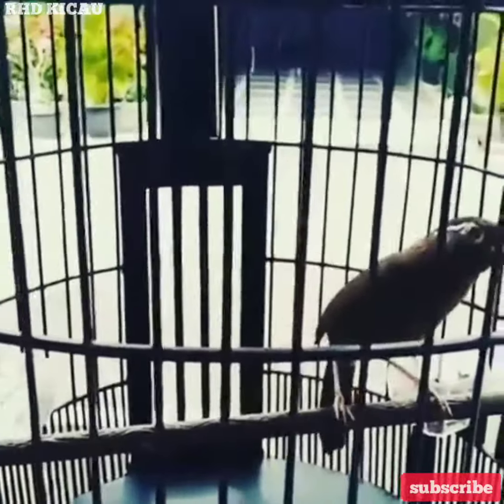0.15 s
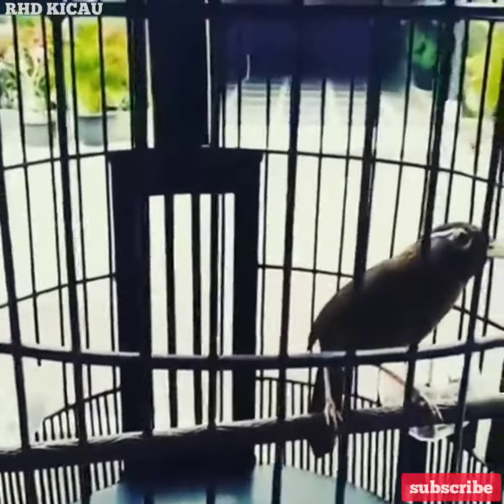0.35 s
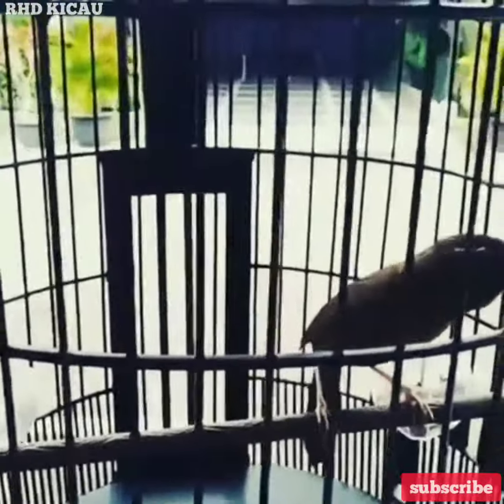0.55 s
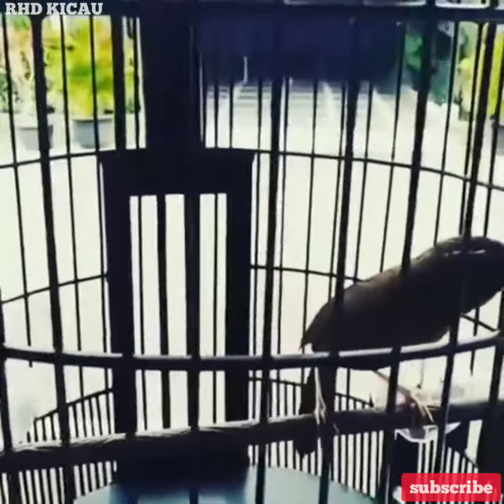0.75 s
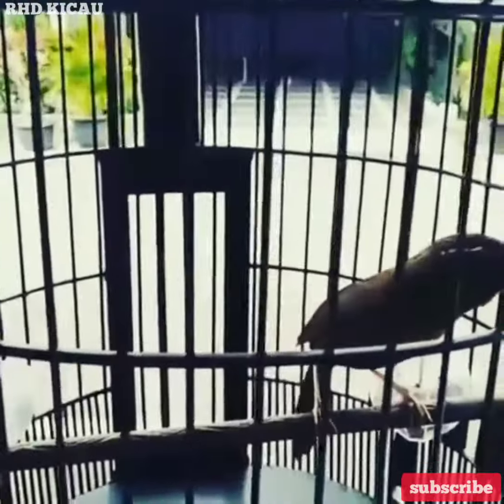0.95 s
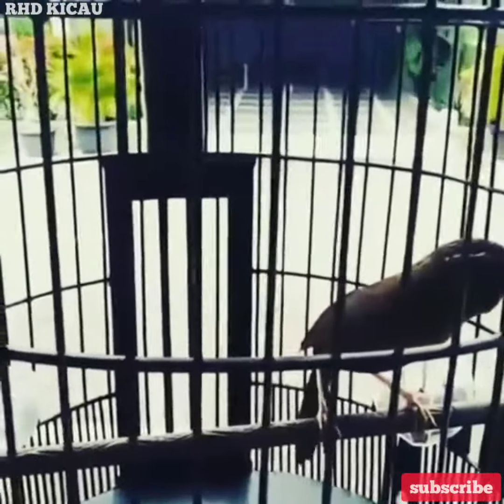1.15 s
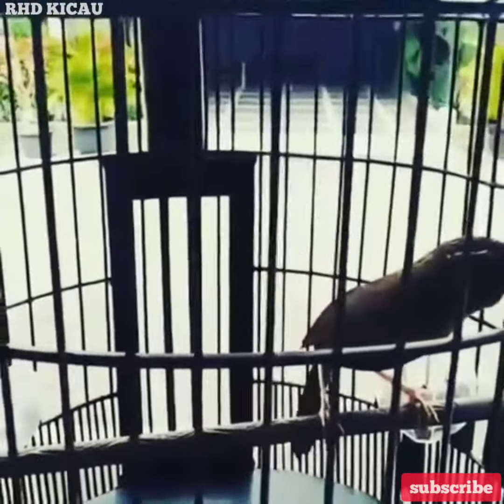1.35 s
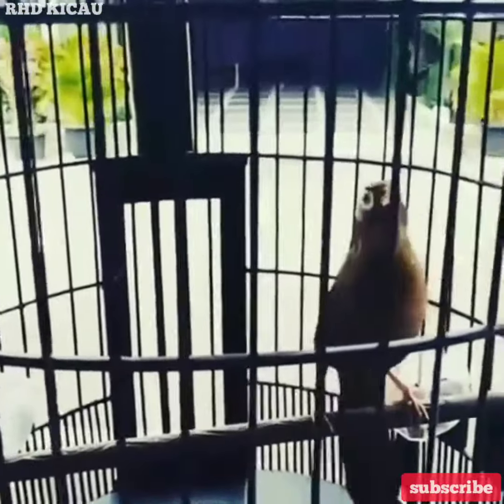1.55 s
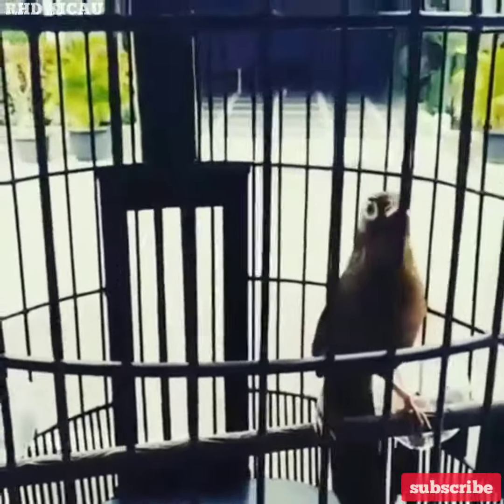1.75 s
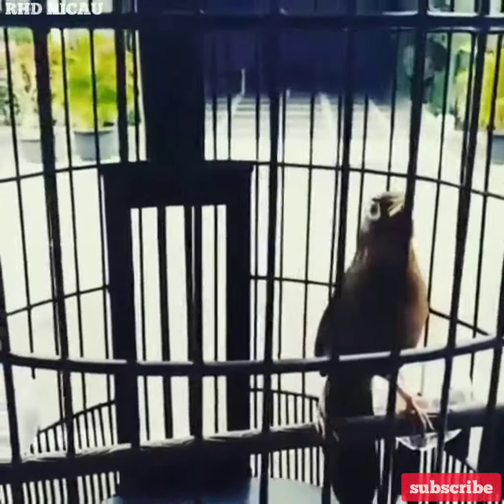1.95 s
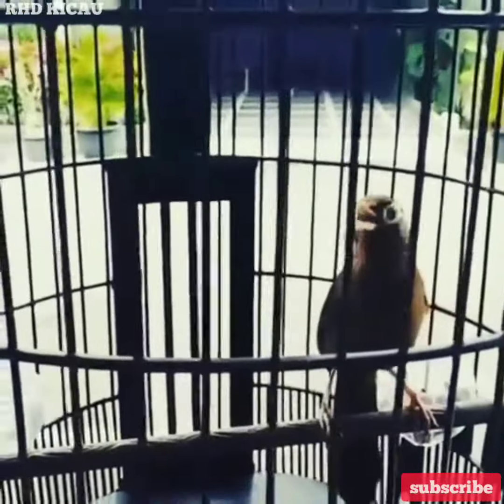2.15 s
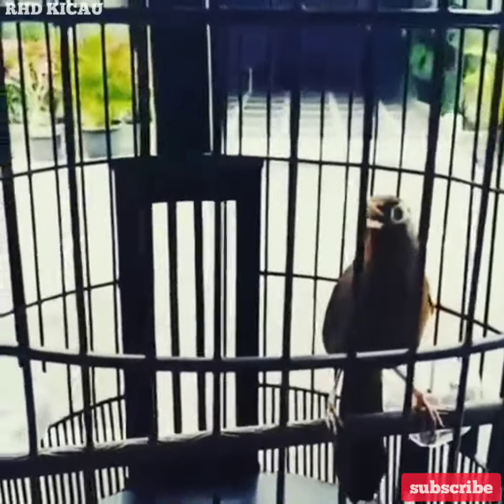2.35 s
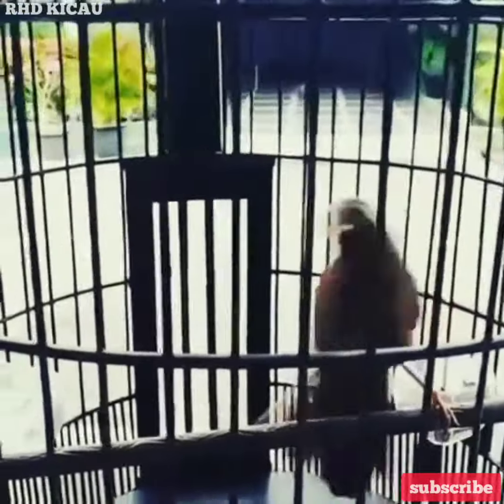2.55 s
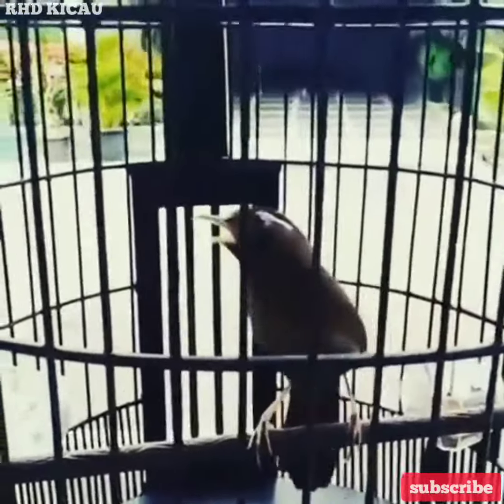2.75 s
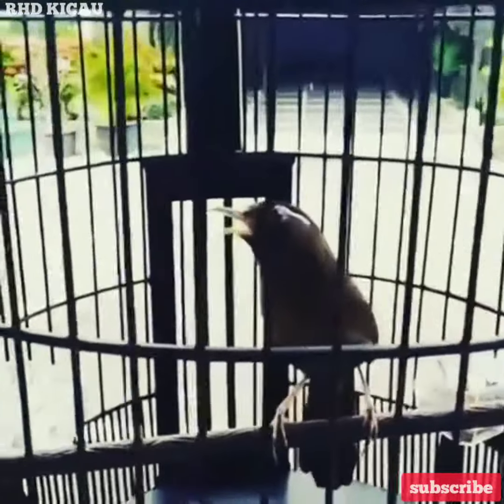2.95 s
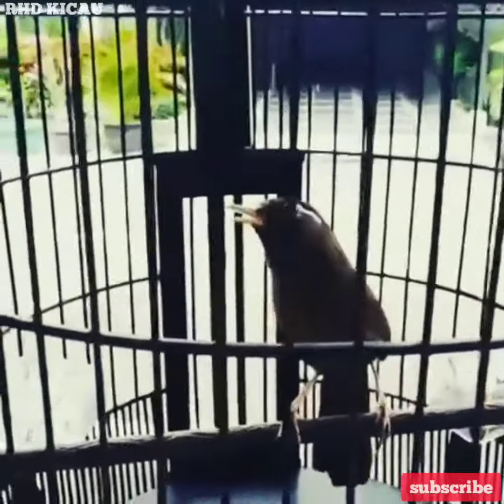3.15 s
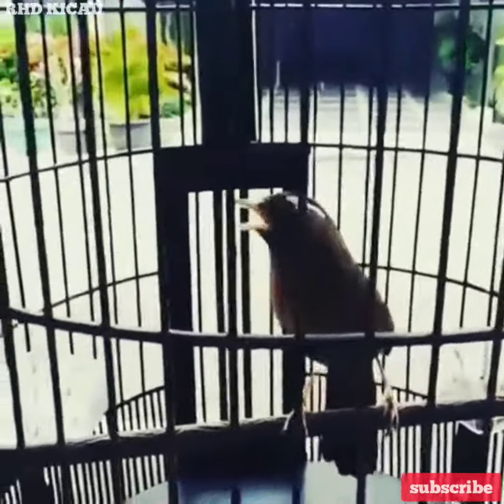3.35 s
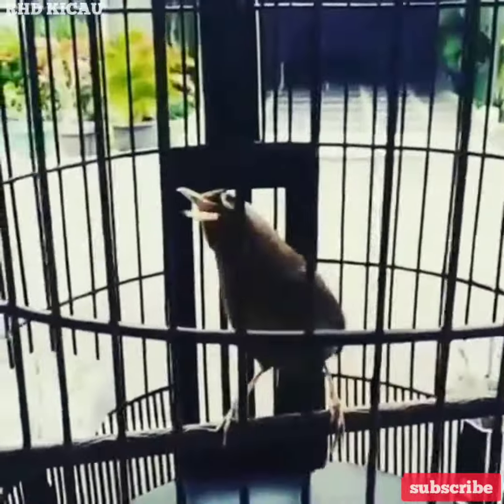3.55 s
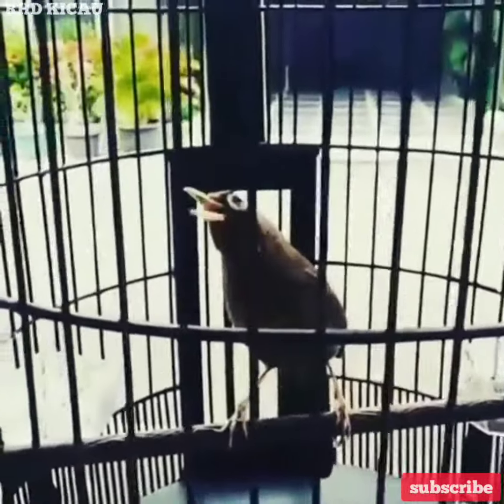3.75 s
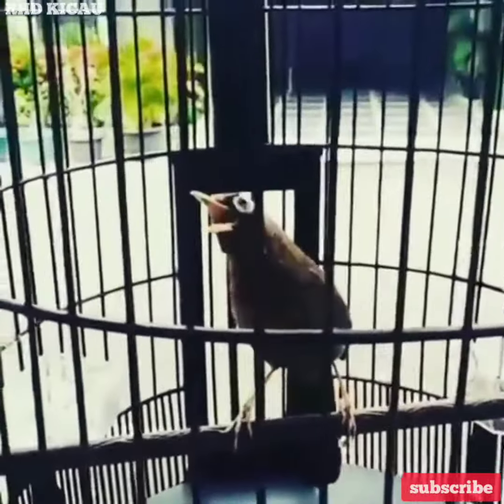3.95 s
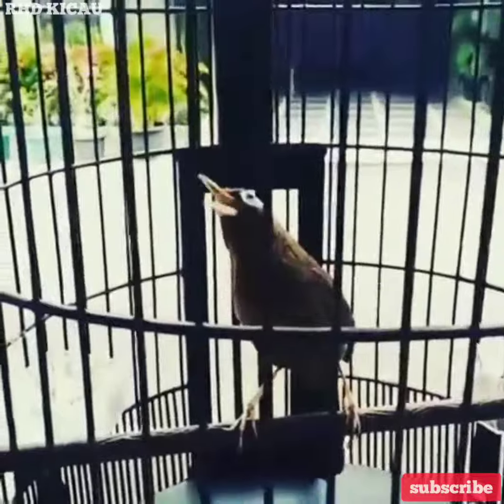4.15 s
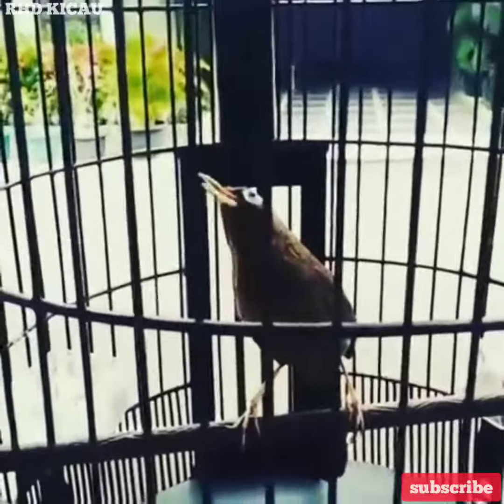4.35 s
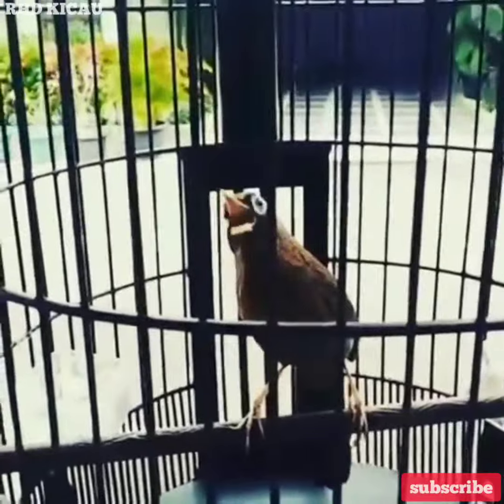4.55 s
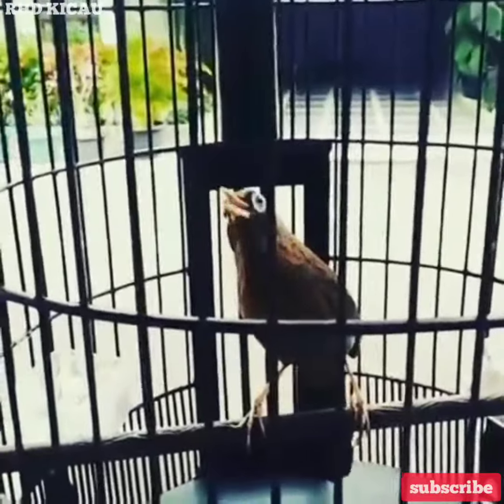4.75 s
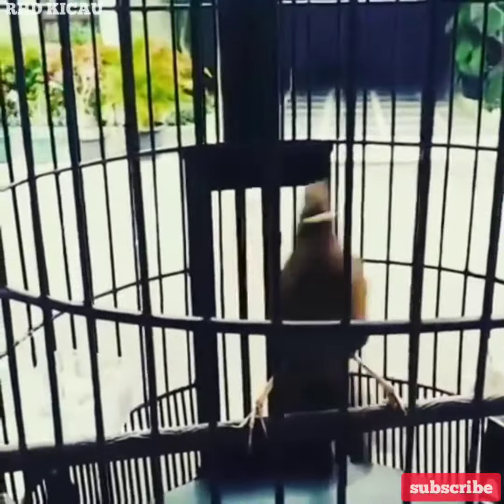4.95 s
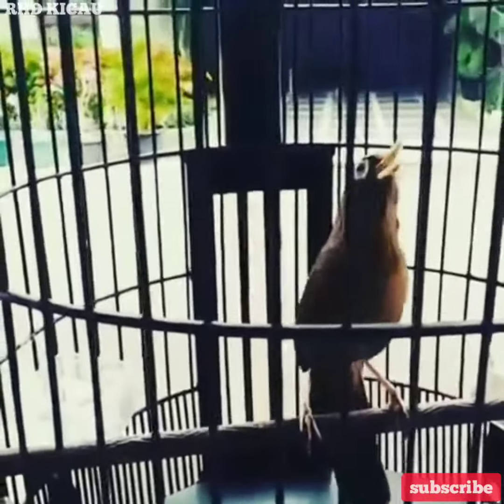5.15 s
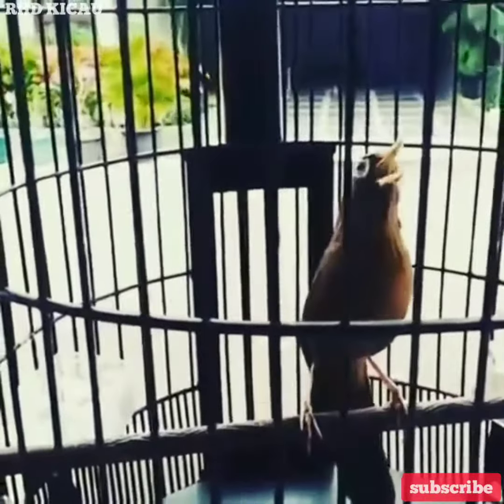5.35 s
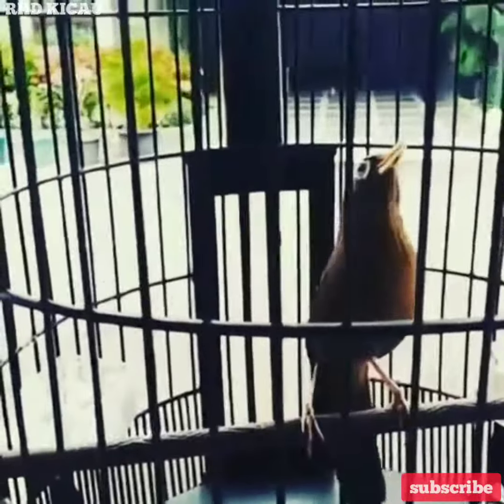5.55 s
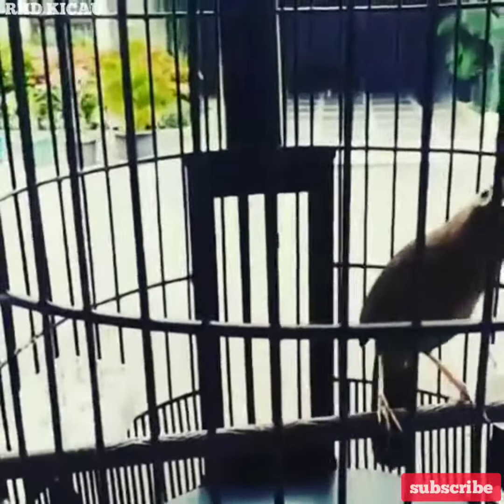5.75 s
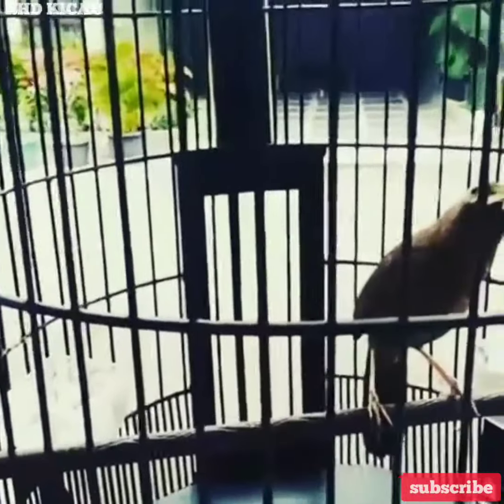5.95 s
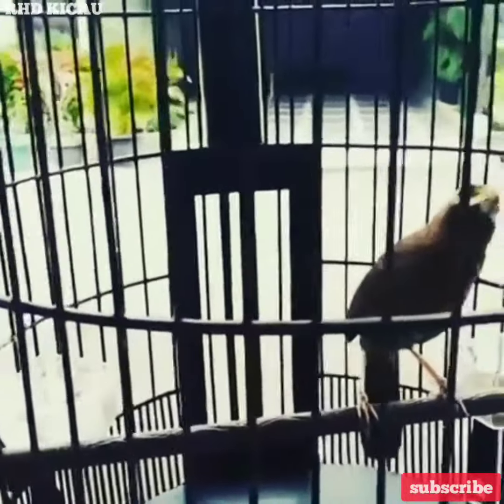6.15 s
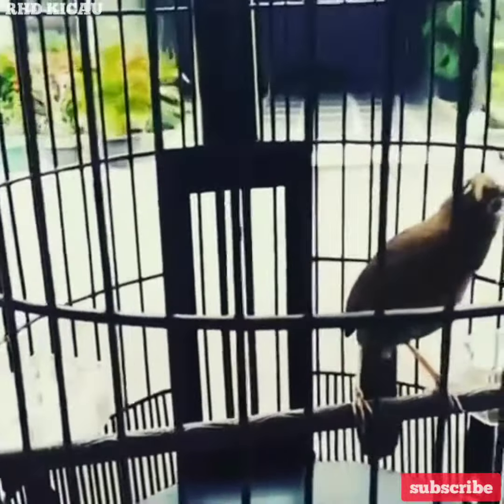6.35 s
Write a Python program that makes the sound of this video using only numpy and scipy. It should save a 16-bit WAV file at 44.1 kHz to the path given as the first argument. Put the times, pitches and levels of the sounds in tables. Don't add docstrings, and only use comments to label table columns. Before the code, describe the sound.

A near bird in a cage sings pure, fluttering whistles with short porch reverberation over a very quiet yard hush. Low slurs repeat at even spacing, then bright shivering trills split by a small buzz, then high whistles and two upward sweeps. Another bird answers softly from afar. Claws knock the perch near the start and again late, before low, blunt wind buffets strike the phone microphone.

```python
import sys
import numpy as np
from scipy import signal
from scipy.fft import rfft, irfft
from scipy.io import wavfile
from scipy.ndimage import uniform_filter1d

SR = 44100
rng = np.random.default_rng(int(sys.argv[2]) if len(sys.argv) > 2 else 0)


def volts_from_decibels(level):
    exponent = np.asarray(level, float) / 20
    return 10 ** exponent


def store_wav(level_fs):
    pcm = np.round(np.clip(np.atleast_2d(level_fs), -1, 1) * 32767)
    wavfile.write(sys.argv[1], SR, pcm.T.astype(np.int16))


N = 282681

# time in seconds, level in dB.
WIND_LEVEL = [(0, -74.5), (2.4, -71.5), (2.65, -63), (3.3, -70), (4.4, -64.5), (5.1, -51.5), (5.6, -64.5),
              (5.8, -74), (5.91, -47.5), (6.08, -35.5), (6.25, -31.5), (6.41, -19)]
# start in seconds, peak in dB, bright part in dB.
BUFFETS = [
    (5.947, -28.5, -43),
    (5.998, -30, -48),
    (6.092, -15, -53),
    (6.15, -18, -59),
    (6.268, -18.5, -16.5),
    (6.347, -28, -14),
    (6.378, -23.5, -6.5),
    (6.398, -16, -18.5),
]
# frequency in Hz, density in dB per Hz.
WIND_COLOUR = [(20, -39.5), (45, 2.5), (75, -2.5), (150, -11), (300, -22), (500, -43), (1000, -59.5),
               (2500, -84.5)]
# frequency in Hz, density in dB per Hz.
HUSH = [(150, -20.5), (300, 0), (600, 1), (1500, -2), (3000, -10.5), (6000, -11.5), (10000, -9),
        (13400, -14)]
HUSH_DB = -69.5
# frequency in Hz, t60 in seconds.
PORCH_T60 = [(500, 0.33), (2000, 0.51), (3500, 0.41), (7000, 0.36), (12000, 0.24)]
# delay in seconds, level in dB.
ECHOES = [(.0007, -20.5), (.0016, -14.5), (.0029, -21), (.0047, -15), (.0083, -13.5), (0.017, -16)]
# frequency in Hz, gain in dB.
WET = [(500, 11), (3800, -2.5), (5000, 5.5), (10000, 9), (13000, 1)]
# frequency in Hz, gain in dB.
MIC_PORT = [(30, 7.5), (100, 17), (4000, 0), (6500, 9.5), (8800, 13), (10200, 20.5), (11500, 17),
            (13000, 5.5)]
# frequency in Hz, level in dB.
GRIT = [(60, -25), (200, -12.5), (700, -5), (1600, -7), (2400, -27.5)]

# start in seconds, length in seconds, level in dB, first pitch in Hz, last pitch in Hz.
FAR_BUZZES = [
    (0.096, 0.45, -39, 3450, 2851),
    (.72, 0.39, -35.5, 3604, 2828),
    (1.215, 0.4, -35.5, 3654, 2930),
    (1.728, 0.37, -34.5, 3598, 2940),
    (6.329, 0.54, -36.5, 3410, 2810),
]
# share of the length, level in dB.
FAR_SWELL = [(0, -8.5), (.3, -3), (.72, -5), (1, -17)]

# start in seconds, peak in dB, wood in dB, wire in dB.
TAPS = [
    (0.081, -59, -32, -3),
    (0.116, -17, -23, -43.5),
    (0.22, -47, -15, -8),
    (5.879, -32, -10.5, -18.5),
]
# frequency in Hz, level in dB, t60 in seconds.
WOOD = [(715, -0.5, 0.27), (1135, -54, 0.057), (1463, 14, 0.047), (2320, -1, 0.074)]
# frequency in Hz, level in dB, t60 in seconds.
WIRE = [(8740, 4, 0.2), (9900, -6, 0.32), (12100, 3, 0.23)]

# multiple of the pitch, level in dB.
OVERTONES = [(2, -37), (3, -44.5), (4, -44), (5, -44.5), (6, -54.5)]
# multiple of the pitch, level in dB re that voice.
HALVES = [(.5, -8.5), (1.5, -7.5), (2.5, -22), (3.5, -29)]
# frequency in Hz, gain in dB.
BEAK = [(3000, -25.5), (4200, -0.5), (5300, 5), (6000, -1), (7200, -18), (8500, 9.5), (10000, 5.5),
        (13000, 9)]
# frequency in Hz, level in dB.
AIR = [(100, -45), (400, -36.5), (1500, -27), (3000, -8), (4500, -15.5), (5600, -26.5), (7200, -19),
       (10000, -22.5), (13000, -31)]
WARBLES_PER_S, BUZZ_PER_S = 110, 195

# time of the lowest pitch in seconds, level in dB, lowest pitch in Hz,
# top of the last warble in Hz, length in seconds.
TRILL = [(2.3994, -9, 2464, 3380, 0.038), (2.5006, -9.5, 2397, 3506, 0.041),
         (2.5942, -8.5, 2390, 3393, 0.046), (2.695, -10, 2347, 3625, .04), (2.7998, -6.5, 2453, 3746, .036),
         (2.9064, -7, 2470, 3704, .035), (3.011, -6, 2513, 3800, 0.037), (3.118, -5, 2512, 3763, 0.034),
         (3.5915, -6.5, 2500, 3774, .032), (3.6977, -9, 2444, 3914, 0.036), (3.8028, -7, 2517, 3880, 0.04),
         (3.9196, -7, 2495, 3932, 0.031), (4.0264, -6.5, 2503, 3930, .033)]
BEAK_SHUT_HZ, BEAK_DB_PER_KHZ = 3158, 15
TRILL_CLIMB_HZ, FIRST_SWING_HZ = 420, 678.7

# time of the jump up in seconds, level in dB, lead-in in Hz, sag at the top in dB, end in Hz.
SLURS = [
    (.74, -3, 1617, -13, 1711),
    (1.037, -0.5, 1330, -13, 1735),
    (1.31, 0, 1356, -8, 1703),
    (1.6, -0.5, 1342, -9.5, 1738),
    (1.885, -2.5, 1377, -0.5, 1709),
]
SLUR_TOP_HZ, SLUR_BEAK_DB, SLUR_AIR_DB = 2131.4, -5.5, 3.5
LEAD_DB_PER_KHZ = 28.5

# time after start in seconds, level in dB, pitch in Hz,
# warble swing above it in Hz, half-pitch voice in dB.
OPENER = [(0, -33, 3227, 1, -43.5), (.014, -13, 2794, -0.5, -53), (.019, -15.5, 2748, 299.5, -67.5),
          (.046, -14, 2950, 549, -49), (.069, -14.5, 3260, 950, -24)]
# as for the opener, in s, dB, Hz, Hz, dB.
BUZZ = [(0, -22, 2640, 0.5, -35), (.011, -19, 2507, -1.5, -43), (.019, -20.5, 1807, 193, -39),
        (.049, -17, 1896, 360, -42), (.084, -15, 1990, 625, -54), (.109, -20, 1835, 600.5, -43),
        (.137, -20.5, 1736, 600.5, -22), (.151, -32.5, 1253, 795.5, -19), (.171, -51, 894, 900, -50)]
# as for the opener, in s, dB, Hz, Hz, dB.
CLIMB = [(0, -21, 3220, -1.5, -39), (.024, -11, 2595, -1, -49.5), (.029, -14.5, 2697, 830, -72),
         (.053, -11.5, 3205, 596.5, -68), (.065, -13.5, 3686, 1.5, -60.5), (.112, -9, 3365, 0.5, -54.5),
         (.143, -8, 3522, 0.5, -42), (.157, -12.5, 3194, 980.5, -31), (.174, -33.5, 2540, 1588, -41)]
# as for the opener, in s, dB, Hz, Hz, dB.
DIP = [(0, -35, 3700, 0, -15), (.022, -11.5, 3991, 0, -24.5), (.048, -9.5, 3955, 0, -36),
       (.067, -8.5, 3412, 1.5, -54.5), (.091, -12.5, 3195, -1.5, -53.5), (.13, -7, 3410, 1.5, -49.5),
       (.14, -12.5, 3440, -2.5, -52), (.147, -14, 3130, 948.5, -32.5), (.16, -27, 2530, 1530.5, -39.5)]
# as for the opener, in s, dB, Hz, Hz, dB.
RISE = [(0, -42.5, 1523, 16, -50.5), (.018, -36, 1595, 98, -34.5), (.03, -20.5, 1840, 297.5, -31),
        (.06, -14.5, 2030, 351, -43.5), (.095, -10.5, 2329, 251.5, -47.5), (.17, -9.5, 2470, 70, -54),
        (.225, -10.5, 2577, 7, -58), (.29, -8.5, 2866, 4, -40), (.31, -22.5, 2840, 348.5, -23)]
# start in seconds, stretch in time, pitch ratio, overtones in dB, air in dB.
OPENERS = [
    (2.284, .98, 1.02, 4, 7),
    (3.463, 1.03, .98, 5, 9.5),
]
# as for the openers, in s, ratio, ratio, dB, dB.
BUZZES = [
    (3.221, 1.001, 0.99, 1.2, 0),
]
# as for the openers, in s, ratio, ratio, dB, dB.
CLIMBS = [
    (4.115, 1.001, 1.001, 13.8, 8.8),
]
# as for the openers, in s, ratio, ratio, dB, dB.
DIPS = [
    (4.378, .995, .995, 12.5, 10),
    (4.632, 1.09, 1.005, 11.2, 9.8),
]
# as for the openers, in s, ratio, ratio, dB, dB.
RISES = [
    (4.919, 1.001, 1.005, -2.4, -5.5),
    (5.341, .9, .98, -0.5, 3),
]


def evened(x):
    return x / np.sqrt(np.mean(x ** 2) + 1e-20)


def read(points, hz):
    f, value = np.transpose(points)
    return np.interp(np.log(hz + 1), np.log(f + 1), value)


def add(mix, s, sound):
    part = mix[round(s * SR):][:len(sound)]
    part += sound[:len(part)]


def colour(x, points):
    return irfft(rfft(x) * volts_from_decibels(read(points, np.fft.rfftfreq(len(x), 1 / SR))), len(x))


def wander(count, per_s):
    width = max(int(SR / per_s), 1)
    return evened(uniform_filter1d(uniform_filter1d(rng.standard_normal(count), width), width))


def yard():
    return volts_from_decibels(HUSH_DB) * evened(colour(rng.standard_normal(N), HUSH))


def wind():
    s, db = np.transpose(WIND_LEVEL)
    flow = evened(colour(rng.standard_normal(N), WIND_COLOUR))
    out = flow * volts_from_decibels(np.interp(np.arange(N) / SR, s, db) + 3.5 * wander(N, 25))
    t = np.arange(1500) / SR
    for s, db, bright_db in BUFFETS:
        push = np.sin(2 * np.pi * 85 * t) * np.exp(-t / 0.004) * np.minimum(t / 0.00187, 1)
        snap = colour(rng.standard_normal(len(t)), [(250, -39.0), (450, 18.5), (1000, -1.0), (1600, -52.0)])
        snap = evened(snap) * np.exp(-t / 0.011) * np.minimum(t / 0.00145, 1)
        add(out, s, volts_from_decibels(db + 1.0) * (push + volts_from_decibels(bright_db) * snap))
    vent = signal.butter(3, 52, "high", fs=SR, output="sos")
    return signal.sosfilt(vent, out)


def porch(x):
    taps = np.zeros(SR)
    at = np.arange(500, SR - 20, 20)
    taps[at + rng.integers(0, 20, len(at))] = rng.choice([-1., 1.], len(at))
    hz, t, z = signal.stft(taps, SR, nperseg=256)
    decay = volts_from_decibels(-60 * t / read(PORCH_T60, hz)[:, None])
    tail = signal.istft(z * decay, SR, nperseg=256)[1]
    return signal.fftconvolve(x, tail / np.linalg.norm(tail))[:N]


def far_bird():
    out = np.zeros(N)
    for s, length, db, first_hz, last_hz in FAR_BUZZES:
        t = np.arange(0, length, 1 / SR)
        flutter = np.cumsum(170 * (1 + 0.36 * wander(len(t), 90))) / SR
        pitch = first_hz + (last_hz - first_hz) * t / length + 190 * np.sin(2 * np.pi * flutter)
        turn = 2 * np.pi * np.cumsum(pitch) / SR
        voice = np.sin(turn) + volts_from_decibels(-46) * np.sin(2 * turn) + volts_from_decibels(-48) * np.sin(3 * turn)
        air_colour = [(4500, -30.5), (5800, -2.5), (7000, -9), (9000, 1.0), (13000, -19.5)]
        voice += volts_from_decibels(-23.5) * colour(rng.standard_normal(len(t)), air_colour)
        voice *= 1 - .45 * np.cos(2 * np.pi * flutter)
        swell = volts_from_decibels(db + np.interp(t / length, *np.transpose(FAR_SWELL)))
        add(out, s, swell * voice * signal.windows.tukey(len(t), .3))
    return out


def claws():
    out, t = np.zeros(N), np.arange(9000) / SR
    attack = np.minimum(t / 0.005, 1)
    for s, db, wood_db, wire_db in TAPS:
        for part_db, modes, blur_per_s in ((wood_db - 23.5, WOOD, 300), (wire_db - 20.0, WIRE, 900)):
            for hz, mode_db, t60 in modes:
                ring = volts_from_decibels(db + part_db + mode_db - 60 * t / t60) * np.sin(2 * np.pi * hz * t)
                add(out, s, ring * wander(len(t), blur_per_s) * attack)
    return out


def note(per_s, rows, bright_db, air_db):
    fast = per_s > 160
    s, *columns = np.transpose(rows)
    t = np.arange(s[0], s[-1], 1 / SR)
    age = t - s[0]
    level_db, hz, swing, half_db = (np.interp(t, s, c) for c in columns)

    uneven = 0.11 * swing / (300 if fast else 900)
    flutter = np.cumsum((swing > 0) * per_s * (1 + uneven * wander(len(t), 180))) / SR
    lift = (1 - np.cos(2 * np.pi * flutter)) / 2
    bend_s = .008 if len(rows) > 7 else .002
    hz = uniform_filter1d(hz, size=int(SR * bend_s), mode="nearest")
    pitch = hz + swing * lift + 14 * wander(len(t), 230)
    turn = 2 * np.pi * np.cumsum(pitch) / SR

    opening = np.minimum(age / 0.036, 1) ** 2
    late = opening
    if fast:
        late = opening * np.minimum(age / 0.091, 1) ** 2
    rasp = 1 + 0.48 * wander(len(t), 770)
    overtones = np.zeros(len(t))
    for k, db in OVERTONES:
        overtones += volts_from_decibels(db + read(BEAK, k * pitch)) * np.sin(k * turn) * (k * pitch < SR / 2.5)
    halves = volts_from_decibels(half_db) * sum(volts_from_decibels(db) * np.sin(k * turn) for k, db in HALVES)

    depth = 0.22 * np.minimum(swing / 150, 2) if fast else 0.35 * np.minimum(swing / 400, 1)
    throb = 1 - depth * np.cos(2 * np.pi * flutter - (0 if fast else 1.67))
    fade = np.minimum(1, np.minimum(age, s[-1] - t) / 0.0028)
    drive = np.sqrt(2) * volts_from_decibels(level_db) * throb * np.sin(np.pi / 2 * fade) ** 2
    voice = np.sin(turn) + volts_from_decibels(bright_db) * late * rasp * overtones + halves
    stir = volts_from_decibels(air_db) * opening * (0.33 + swing / 1200) * volts_from_decibels(3.3 * wander(len(t), 76))
    return s[0], drive * voice, drive * stir


def slur(s, db, lead_hz, sag_db, end_hz):
    lead_db = db + LEAD_DB_PER_KHZ * (lead_hz - 1300) / 1000
    top_db = db - 10.5 + sag_db
    rows = [(s - .062, lead_db - 49.5, 1.03 * lead_hz, 0, -34),
            (s - .014, lead_db - 36, .985 * lead_hz, 0, -38),
            (s, db - 14, .92 * SLUR_TOP_HZ, 0, -44),
            (s + 0.0095, top_db, SLUR_TOP_HZ, 0, -36),
            (s + .025, top_db, .99 * SLUR_TOP_HZ, 0, -38),
            (s + .037, db - 11.0, .935 * SLUR_TOP_HZ, 0, -58),
            (s + .07, db - 20.5, 1.03 * end_hz, 0, -38),
            (s + .116, db - 21.5, .995 * end_hz, 0, -44)]
    return note(BUZZ_PER_S, rows, SLUR_BEAK_DB, SLUR_AIR_DB)


def trill_note(s, db, low_hz, top_hz, length):
    beak_db = BEAK_DB_PER_KHZ * (top_hz - BEAK_SHUT_HZ) / 1000
    last_swing = top_hz - low_hz - TRILL_CLIMB_HZ
    rows = [(s - .022, db - 17.5, low_hz + 720, 0, -55),
            (s - .015, db - 11, low_hz + 430, 0, -55),
            (s - .005, db - 5.0, low_hz + 270, 0, -55),
            (s, db - 5.5, low_hz, 0, -55),
            (s + 0.002966, db - 5.5, low_hz, FIRST_SWING_HZ, -55),
            (s + .65 * length, db - 4.5, low_hz + 0.66 * TRILL_CLIMB_HZ, 1.15 * last_swing, -55),
            (s + 1.036 * length, db - 11, low_hz + TRILL_CLIMB_HZ, 1.1 * last_swing, -55)]
    return note(WARBLES_PER_S, rows, beak_db - 4.5, beak_db + 0.5)


def whistle(shape, per_s, s, stretch, ratio, bright_db, air_db):
    rows = [(s + stretch * after, db, ratio * hz, swing, half_db) for after, db, hz, swing, half_db in shape]
    return note(per_s, rows, bright_db, air_db)


def singer():
    song, stirred = np.zeros((2, N))
    kinds = [(OPENER, WARBLES_PER_S, OPENERS), (BUZZ, BUZZ_PER_S, BUZZES), (CLIMB, WARBLES_PER_S, CLIMBS),
             (DIP, WARBLES_PER_S, DIPS), (RISE, BUZZ_PER_S, RISES)]
    notes = [slur(*row) for row in SLURS] + [trill_note(*row) for row in TRILL]
    notes += [whistle(shape, per_s, *row) for shape, per_s, rows in kinds for row in rows]
    for s, voice, stir in notes:
        add(song, s, voice)
        add(stirred, s, stir)
    return volts_from_decibels(-3.0) * song + volts_from_decibels(-20.0) * stirred * colour(rng.standard_normal(N), AIR)


def scene():
    near, far = singer() + claws(), far_bird()
    air = near + 0.37 * far + porch(volts_from_decibels(-13) * colour(near, WET) + volts_from_decibels(-1.5) * far)
    for s, db in ECHOES:
        add(air, s, volts_from_decibels(db) * near)
    air += volts_from_decibels(-49.0) * air ** 2
    loudness = uniform_filter1d(air ** 2, size=200)
    air += volts_from_decibels(-37.0) * loudness * evened(colour(rng.standard_normal(N), GRIT))
    return np.tile(colour(air, MIC_PORT) + yard() + wind(), (2, 1))


def thin_treble(mono):
    hz, t, z = signal.stft(mono, SR, nperseg=1024)
    band = np.searchsorted([3600, 4400, 5200, 6200, 7000, 7800, 9000, 10200, 11400, 12300], hz)
    power = abs(z) ** 2
    band_db = np.array([10 * np.log10(power[band == k].mean(0) + 1e-20) for k in range(11)])
    luck, dice = rng.random((2, 11, len(t) // 3 + 1)).repeat(3, 2)[:, :, :len(t)]
    masked = band_db < 10 * np.log10(power.max(0)) - 51 - 18 * luck
    masked[-1] |= luck[0] < .4
    treble = (band > 0)[:, None]
    mid = signal.istft(z * (1 - .85 * treble * masked[band]), SR, nperseg=1024)[1][:N]

    swapped = (dice < .4)[band] * ~masked[band] * (hz > 4100)[:, None]
    level = np.sqrt(abs(uniform_filter1d(power, size=20, axis=0)))
    a, b = rng.standard_normal((len(t), len(hz), 2)).T
    side = volts_from_decibels(-9) * signal.istft(swapped * level * (a + 1j * b), SR, nperseg=1024)[1][:N]
    return np.array([mid + side, mid - side])


def roll_off(x):
    return signal.sosfilt(signal.butter(12, 13600, fs=SR, output="sos"), x)


def record(dry):
    over = np.maximum(abs(dry[0]) - .6, 0)
    bent = dry[0] - np.sign(dry[0]) * (over - .2 * np.tanh(over / .2))
    edge = signal.firwin(401, 13250, window=("kaiser", 9), fs=SR)
    mix = signal.oaconvolve(thin_treble(bent), edge[None], "same")
    return roll_off(mix)


dry = scene()
out = record(dry)
store_wav(out)
```